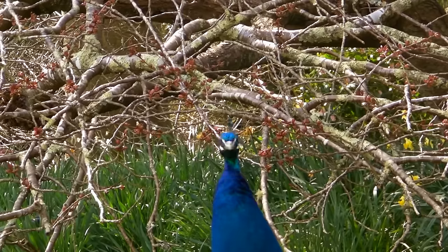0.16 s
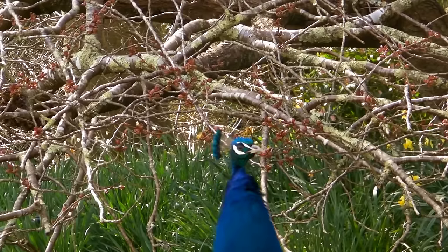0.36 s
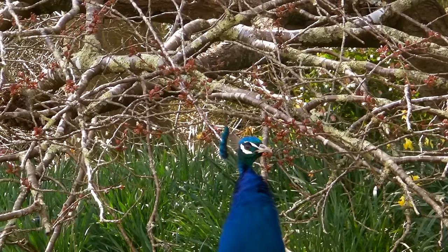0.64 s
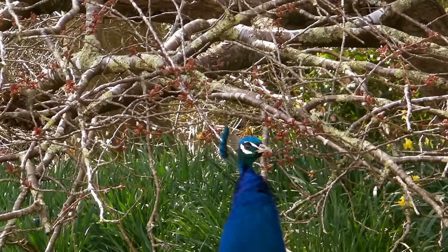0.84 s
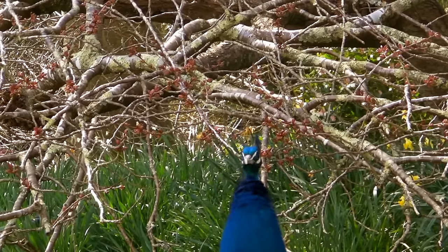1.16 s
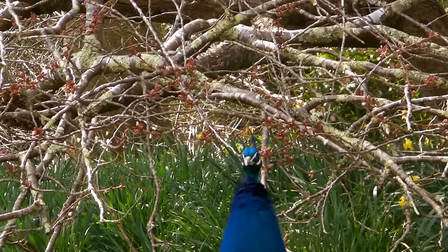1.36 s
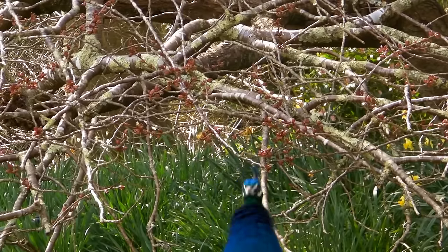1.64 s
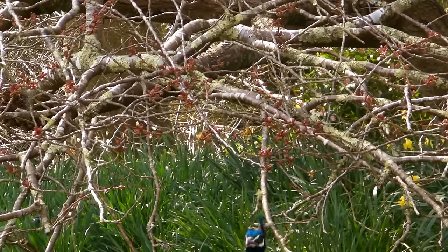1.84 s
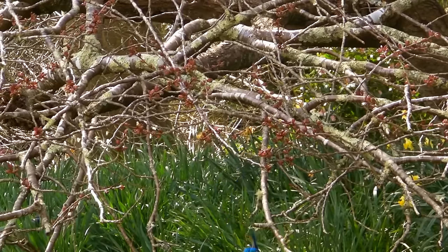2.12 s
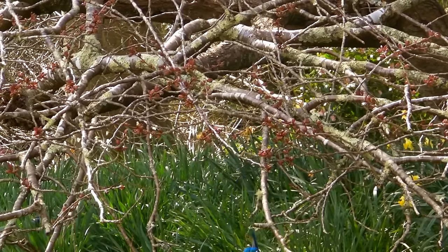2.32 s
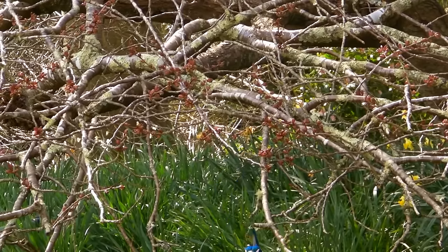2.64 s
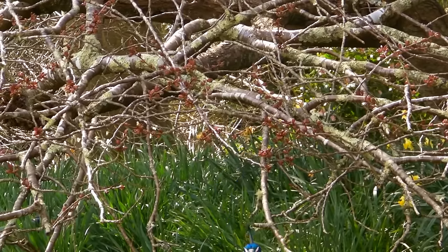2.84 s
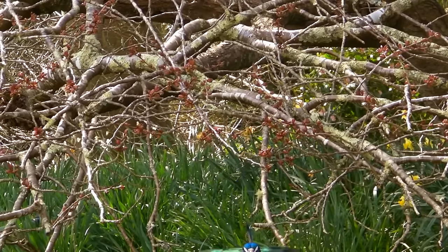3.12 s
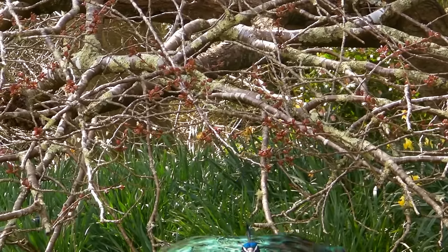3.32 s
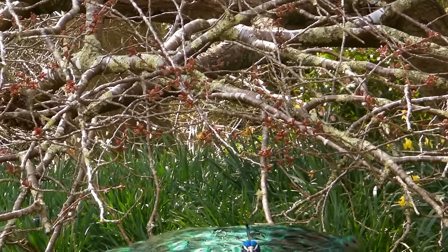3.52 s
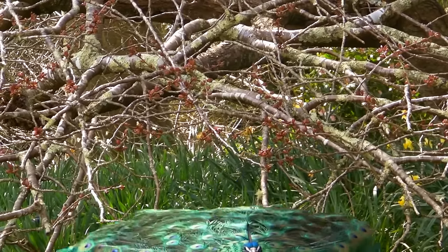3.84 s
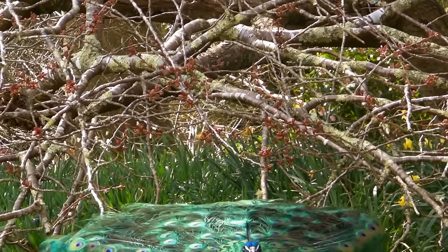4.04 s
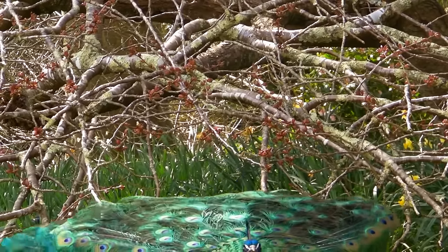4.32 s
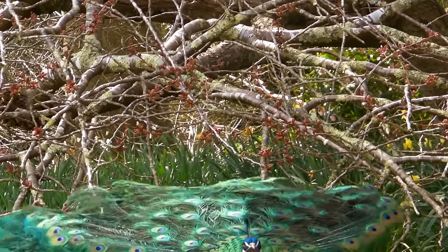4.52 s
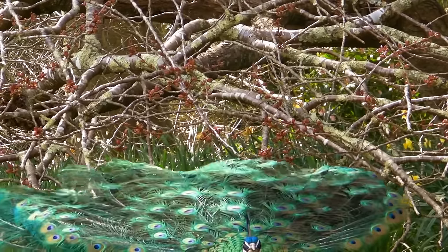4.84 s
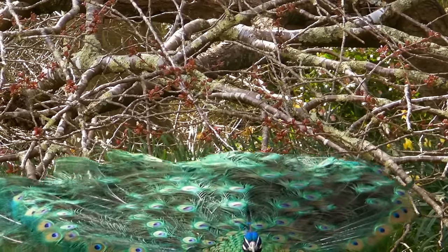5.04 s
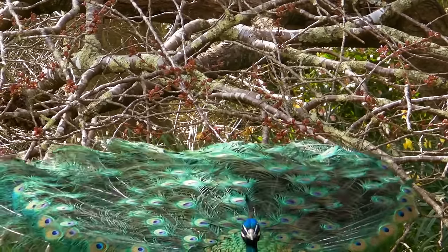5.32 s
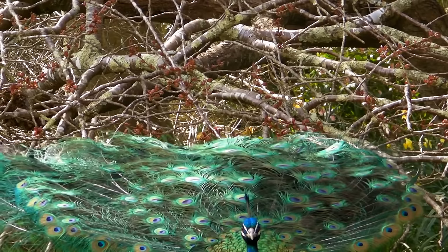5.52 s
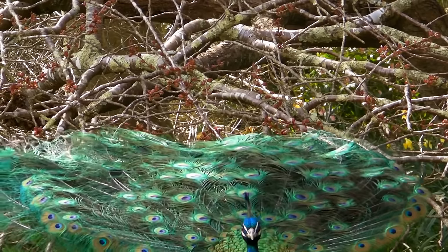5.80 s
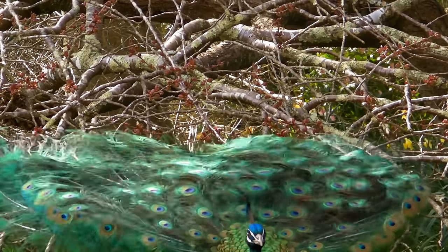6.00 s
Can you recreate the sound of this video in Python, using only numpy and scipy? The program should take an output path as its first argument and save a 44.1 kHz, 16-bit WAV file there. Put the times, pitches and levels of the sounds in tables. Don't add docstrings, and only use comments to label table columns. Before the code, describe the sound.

A peafowl close by screams three loud, nasal arching calls in a garden, after small birds whistle faintly over distant traffic hum; feathers rustle at the end.

```python
import sys
import numpy as np
from scipy import signal
from scipy.fft import rfft, irfft
from scipy.io import wavfile
from scipy.ndimage import uniform_filter1d

SR = 44100
rng = np.random.default_rng(int(sys.argv[2]) if len(sys.argv) > 2 else 0)


def rack_gain(trim_db):
    fader = np.asarray(trim_db, float)
    return 10 ** (fader / 20)


def pcm_store(signal):
    levels = np.round(np.clip(np.atleast_2d(signal), -1, 1) * 32767)
    wavfile.write(sys.argv[1], SR, levels.astype(np.int16).T)


N = 271832

# time in seconds, effort in dB, pitch in Hz.
CALLS = [
    [(2.146, -36.5, 626), (2.195, -9.5, 712), (2.283, -2.5, 850.6), (2.36, -0.5, 889), (2.62, 5, 892.6),
     (2.69, 5, 851.4), (2.79, 0.5, 790), (2.835, -1.5, 736.5), (2.86, -12.5, 641)],
    [(3.096, -36, 645), (3.116, -10, 689.6), (3.17, -5.5, 763), (3.225, -3, 814), (3.36, 0, 854.7),
     (3.5, -1.5, 808.4), (3.56, -0.5, 768), (3.612, -0.5, 699.5), (3.634, -13.5, 630)],
    [(3.89, -27, 626), (3.912, -9, 700), (3.96, -4.5, 769.7), (4.04, -2, 829), (4.17, 1.1, 843.3),
     (4.29, 1.7, 817), (4.38, -1.2, 758), (4.445, -1.5, 691.7), (4.472, -14, 633)],
]
# windpipe shortening as a factor, rasp held in seconds,
# side tones' start in seconds, side tones' end in seconds, edge in dB per octave above 4 kHz.
VOICINGS = [
    (1.038, .068, .15, .255, -3),
    (0.9997, .02, .085, .105, -1.5),
    (0.99, .012, .02, .03, -3),
]


def peafowl():
    fowl = np.zeros(N)
    for rows, voicing in zip(CALLS, VOICINGS):
        add(fowl, *cry(rows, *voicing))
    return fowl


def cry(rows, neck, rasp_s, side_s, side_end_s, edge_db):
    times, efforts, pitches = np.transpose(rows)
    t = np.arange(times[0], times[-1], 1 / SR)
    since, left = t - t[0], t[-1] - t
    effort_db = np.interp(t, times, efforts)
    hz = eased(t, times, pitches) * (1 + .0005 * drift(len(t), .008))
    turn = 2 * np.pi * np.cumsum(hz) / SR

    rasp_db = np.maximum(ramp(since - rasp_s, -14, -56, 600), ramp(left, -24, -56, 300))
    away = np.minimum.reduce([since - rasp_s, left, np.maximum(side_s - since, since - side_end_s)])
    second_db = ramp(away, -24, -50, 330)

    second_rate = 0.32
    whole = np.arange(1, 25)
    k = np.concatenate([whole, whole[:17] + second_rate, whole[:17] + 1 - second_rate])[:, None]
    every = slice(None, None, 64)
    f = k * hz[every]

    chest_db = -3.5 + (3 - 0.49 * effort_db) * np.exp(-since / 0.11)
    tone_db = chest_db[every] * (k < 2.2) + edge_db * np.log2(np.maximum(f / 4000, 1))
    tone_db = tone_db - 4 * np.exp(-left[every] / 0.049) * (k > 4.5)
    flutter_db = .65 * np.log2(k) * np.array([drift(f.shape[1], .03 / 64) for _ in k])
    side_tilt_db = 4.5 * np.log2(np.maximum(k / 3, 1))
    side_db = (k % 1 > 0) * (second_db[every] + 2 * flutter_db + side_tilt_db)
    sizes = pipe(f / neck) * rack_gain(tone_db + flutter_db + side_db) * (f < 16500)
    loaded = .9
    sizes /= np.sqrt((sizes ** 2).sum(0) / 2) ** (1 - loaded)

    bent = turn + (.2 * rack_gain(second_db) + .7 * rack_gain(rasp_db)) * drift(len(t), .0015)
    stack = np.zeros(len(t))
    for number, size, start in zip(k[:, 0], sizes, rng.uniform(0, 2 * np.pi, len(k))):
        stack += np.interp(t, t[every], size) * np.cos(number * bent + start)

    cycle = turn / (2 * np.pi) % 1
    puffs = (1.4 + np.exp(-cycle / 0.98)) * rng.standard_normal(len(t))
    rasp = evened(coloured(puffs, lambda f: pipe(f / neck) ** .7))
    voice = stack + rack_gain(rasp_db + 3) * rasp
    return t[0], rack_gain(effort_db) * voice * signal.windows.tukey(len(t), .02)


# centre in Hz, width in Hz, level in dB.
RESONANCES = [(668, 225, -12.5), (1519, 201, -8), (2247, 287, 3), (2611, 440, 0.5), (3214, 131, -5.5),
              (3828, 170, -12), (4452, 327, -13.5), (5045, 270, -12.5), (5696, 470, -15), (6515, 2100, -23),
              (7490, 315, -15), (8235, 190, -17), (9010, 630, -23.5), (10920, 1270, -20),
              (13570, 2500, -22)]


def pipe(hz):
    notch = rack_gain(-5 / (1 + (2 * (hz - 2410) / 110) ** 2))
    power = sum((rack_gain(db) / (1 + (2 * (hz - f) / w) ** 2)) ** 2 for f, w, db in RESONANCES)
    return notch * np.sqrt(power)


# frequency in Hz, level in dB.
ASIDE = [(60, -3), (150, -3), (380, -6), (950, -38), (2380, -22), (5980, -14.5), (15000, -11.5)]


def scatter(x):
    taps = rng.standard_normal(1024) * np.exp(-np.arange(1024) / (0.028 * SR))
    taps = taps / np.linalg.norm(taps)
    taps = coloured(taps, lambda f: rack_gain(read(ASIDE, np.maximum(f, 950))))
    return signal.oaconvolve(x, taps)[:N] * np.array([[1], [-1]])


# frequency in Hz, time to fall 60 dB in seconds.
TREE_DECAY = [(500, .7), (1500, .9), (2500, .9), (4000, .8), (10000, .7)]
# frequency in Hz, level in dB.
LEAVES = [(400, 3), (800, 10), (1500, 5), (2200, -1), (2800, 3), (3800, 5), (5500, 0), (9000, -4),
          (15000, -18)]


def trees(x, first_s, bloom_s, slower):
    taps = np.zeros((2, 2 * SR))
    at = np.arange(0, 2 * SR - 20, 20) + rng.integers(0, 20, (2, 2 * SR // 20 - 1))
    np.put_along_axis(taps, at, rng.choice([-1., 1.], at.shape), 1)
    hz, t, z = signal.stft(taps * rack_gain(1.2 * drift(2 * SR, .015)), SR, nperseg=256)
    rise = np.clip((t - first_s) / bloom_s, 0, 1)
    fall = rack_gain(-60 * t / (slower * read(TREE_DECAY, hz)[:, None]))
    tail = signal.istft(z * rise * fall, SR, nperseg=256)[1]
    tail = coloured(tail + 0.46 * tail[::-1], lambda f: rack_gain(read(LEAVES, f)))
    return signal.fftconvolve(x[None], tail / np.linalg.norm(tail[0]), axes=1)[:, :N]


def swayed(x):
    at = np.arange(N)
    return np.array([np.interp(at + 1.2 * drift(N, .03), at, channel) for channel in x])


# start in seconds, length in seconds,
# first pitch in Hz, end pitch in Hz, level in dB.
WHISTLES = [(.66, .03, 3750, 3700, -56.5), (.705, .06, 3500, 3380, -64), (.682, .07, 2950, 2840, -53.5),
            (.757, .032, 3080, 2760, -46.5), (.785, .05, 2600, 2590, -50), (.83, .12, 2600, 2880, -60),
            (.82, .17, 2920, 3300, -65), (.98, .23, 2860, 2900, -64.5), (.98, .2, 3340, 3410, -58.5),
            (1.17, .08, 3450, 3560, -67), (1.405, .045, 5500, 5200, -63), (1.42, .45, 4480, 4350, -76.5),
            (1.922, 0.024, 4500, 4700, -46), (1.935, 0.112, 4700, 4630, -58),
            (2.015, 0.051, 3613, 3850, -32.5), (2.055, 0.092, 3850, 3720, -61),
            (2.08, .085, 5000, 5400, -41.5),
            (5.141, .13, 4600, 4690, -68), (5.2, .1, 3270, 3340, -66), (5.29, 0.052, 3670, 3470, -58.5),
                (5.68, 0.15, 2360, 2245, -59), (5.736, 0.117, 1625, 1900, -57),
                (5.86, 0.071, 1890, 1900, -59), (6.01, 0.18, 2210, 2094, -56)]
# start in seconds, length in seconds, first pitch in Hz, end pitch in Hz, level in dB.
SWOOPS = [
    (1.284, .13, 7630, 7260, -43),
    (1.402, 0.22, 7160, 6780, -43.5),
    (1.661, .29, 7860, 7170, -44),
    (1.932, .095, 3740, 3642, -30.5),
]


def songbirds():
    birds = np.zeros(N)
    for swoop, notes in enumerate([WHISTLES, SWOOPS]):
        for note in notes:
            add(birds, *whistle(*note, swoop))
    return birds


def whistle(s, length, hz, end_hz, level_db, swoop):
    t = np.arange(0, length, 1 / SR)
    lead = swoop * np.exp(-t / .005)
    hz = (hz + (end_hz - hz) * t / length) * (1 + .24 * lead)
    level_db = level_db - 21 * lead - 16 * swoop * t / length
    tone = np.sin(2 * np.pi * np.cumsum(hz * (1 + .003 * drift(len(t), .003))) / SR)
    level = np.sqrt(2) * rack_gain(level_db + 1.5 * drift(len(t), .005))
    return s, level * tone * signal.windows.tukey(len(t), .5 - .4 * swoop)


# centre in seconds, level in dB, length in seconds.
SHAKES = [(0.298, -58, .04), (4.796, -50.5, 0.21), (4.987, -52, 0.085), (5.364, -56, 0.018),
          (5.424, -59, 0.025), (5.67, -53, 0.024), (5.745, -54, .025), (5.863, -52, 0.12),
          (5.944, -51.5, 0.052), (6.038, -48, 0.13), (6.147, -50.5, 0.096)]
# frequency in Hz, level in dB.
FEATHER = [(300, -12.5), (1000, 10), (3000, 1.5), (7000, -3), (11000, -12), (14000, -3.5), (15200, -37)]


def feathers():
    t = np.arange(N) / SR
    shakes = sum(rack_gain(db) * np.exp(-(2 * (t - s) / length) ** 2) for s, db, length in SHAKES)
    return shakes * rack_gain(3.0 * drift(N, .002)) * shaped(FEATHER, patch_db=1.5, swell_db=.6)


# start in seconds, level in dB, frequency in Hz.
KNOCKS = [(1.333, -37, 183), (2.164, -42, 112), (2.2, -26, 394), (2.855, -41.5, 44.4), (3.105, -40, 123),
          (3.11, -31.5, 376), (3.9, -35, 130.6), (3.9, -29.5, 379), (4.46, -46, 47.8), (5.975, -41.5, 765),
          (6.0, -40, 742), (6.03, -37.5, 715), (6.05, -37, 748), (6.075, -40, 774)]


def knocks():
    out, t = np.zeros(N), np.arange(4000) / SR
    for s, db, hz in KNOCKS:
        u = t / (0.0041 + 0.037 / hz)
        add(out, s, rack_gain(db) * np.sin(2 * np.pi * hz * t) * u * np.exp(1 - u))
    return out


# frequency in Hz, density in dB per Hz.
HUM = [(15, -43), (25, -62), (92, -6), (281, -13), (433, -0.5), (573, -10.5), (840, -14), (1000, -17.5),
       (1550, -20), (2050, -20.5), (2270, -22.5), (3680, -23.5), (11000, -37.5), (14300, -84),
       (22000, -120)]


def traffic():
    return rack_gain(-46.5) * shaped(HUM, patch_db=.6, swell_db=.6)


# frequency in Hz, correlation as a factor.
SAME = [(60, 0.514), (180, 0.17), (550, 0.57), (1650, 0.46), (4970, -0.11), (15000, 0.54)]
# frequency in Hz, left over right in dB.
LEAN = [(60, -2), (240, -4.5), (950, -2.5), (3770, 0.5), (15000, 0)]
# frequency in Hz, lead in radians.
LEAD = [(60, -0.4), (500, 0.35), (3000, -0.31), (15000, -1)]


def shaped(points, patch_db, swell_db):
    frames, hz = N // 256 + 5, np.fft.rfftfreq(1024, 1 / SR)
    a, b, c, d, patches = rng.standard_normal((frames, 513, 5)).T
    patches = evened(uniform_filter1d(uniform_filter1d(patches, 8, 0), 10, 1))
    swell = drift(frames * 256, 0.3)[::256]
    same = np.clip(read(SAME, hz), -1, 1)[:, None]
    left = a + 1j * b
    right = same * left + np.sqrt(1 - same ** 2) * (c + 1j * d)
    right = right * np.exp(-1j * read(LEAD, hz))[:, None]
    lean = rack_gain(read(LEAN, hz)[:, None] / 2)
    level_db = read(points, hz)[:, None] + patch_db * patches + swell_db * swell
    z = np.array([left * lean, right / lean]) * rack_gain(level_db)
    return evened(signal.istft(z, nperseg=1024, noverlap=768)[1][:, :N])


def evened(x):
    return x / np.sqrt(np.mean(x ** 2) + 1e-20)


def drift(count, smooth_s):
    size = max(round(smooth_s * SR), 1)
    return evened(uniform_filter1d(uniform_filter1d(rng.standard_normal(count), size), size))


def eased(t, s, value):
    steps = np.diff(value) / np.diff(s)
    most = 3 * np.minimum(abs(np.r_[steps[0], steps]), abs(np.r_[steps, steps[-1]]))
    slope = np.clip(np.gradient(value, s), -most, most)
    k = np.clip(np.searchsorted(s, t) - 1, 0, len(s) - 2)
    span, rise = s[k + 1] - s[k], value[k + 1] - value[k]
    u = (t - s[k]) / span
    bow = (1 - u) * (slope[k] * span - rise) - u * (slope[k + 1] * span - rise)
    return value[k] + u * rise + u * (1 - u) * bow


def ramp(t, top_db, floor_db, db_per_s):
    return np.maximum(top_db - db_per_s * np.maximum(t, 0), floor_db)


def read(points, hz):
    f, value = np.transpose(points)
    return np.interp(np.log(hz + 1), np.log(f + 1), value)


def coloured(x, gain):
    return irfft(rfft(x) * gain(np.fft.rfftfreq(x.shape[-1], 1 / SR)), x.shape[-1])


def add(mix, s, sound):
    part = mix[round(s * SR):][:len(sound)]
    part += sound[:len(part)]


def scene():
    fowl, birds = peafowl(), songbirds()
    near = fowl * rack_gain([[.15], [-.15]]) + scatter(fowl)
    echoes = rack_gain(-26.5) * trees(fowl, first_s=.012, bloom_s=.09, slower=.92)
    valley = rack_gain(-40.0) * trees(fowl, first_s=0.039, bloom_s=0.064, slower=2.44)
    grove = rack_gain(-7) * trees(birds, first_s=.003, bloom_s=.013, slower=.85)
    aside = birds * rack_gain([[-1.2], [.3]])
    return near + swayed(echoes + valley) + grove + aside + traffic() + feathers() + knocks()


def band_limit(x):
    return signal.sosfilt(signal.butter(12, 15770, fs=SR, output="sos"), x)


def record(dry):
    power_db = 10 * np.log10(abs(uniform_filter1d((dry ** 2).mean(0), 600)) + 1e-12)
    hold = np.exp(-1 / (.1 * SR))
    duck_db = signal.lfilter([1 - hold], [1, -hold], 0.55 * np.maximum(power_db + 24.0, 0))
    edge = signal.firwin(511, 15720, window=("kaiser", 9), fs=SR)[None]
    mix = signal.oaconvolve(dry / rack_gain(duck_db), edge, "same")
    return band_limit(mix)


dry = scene()
out = record(dry)
pcm_store(out)
```